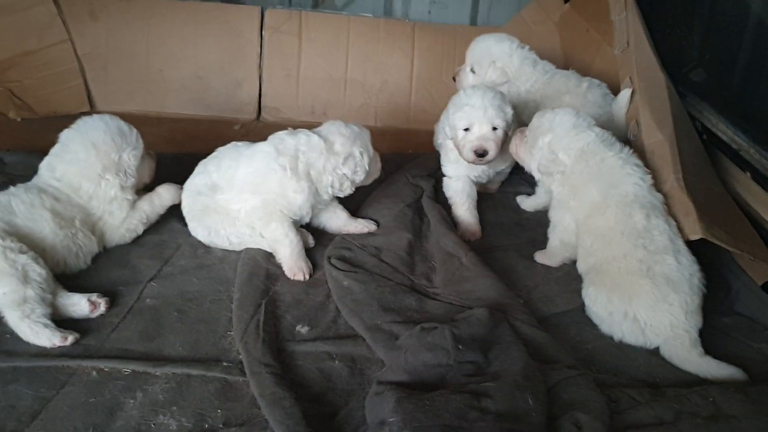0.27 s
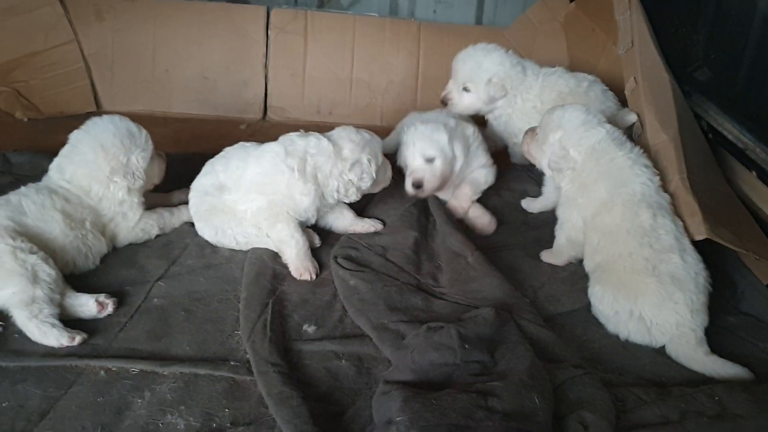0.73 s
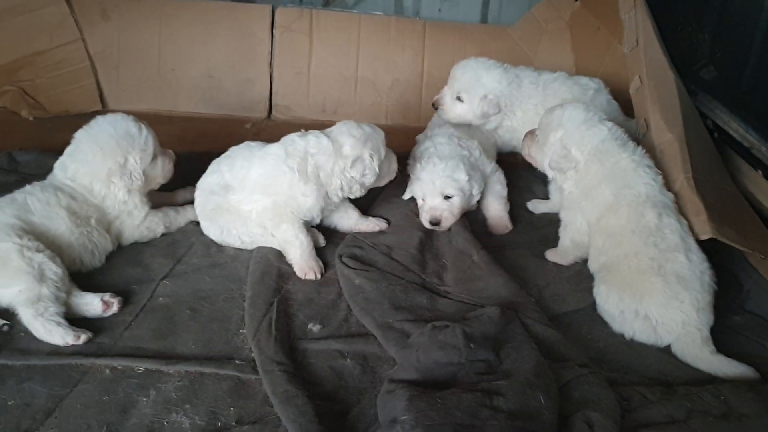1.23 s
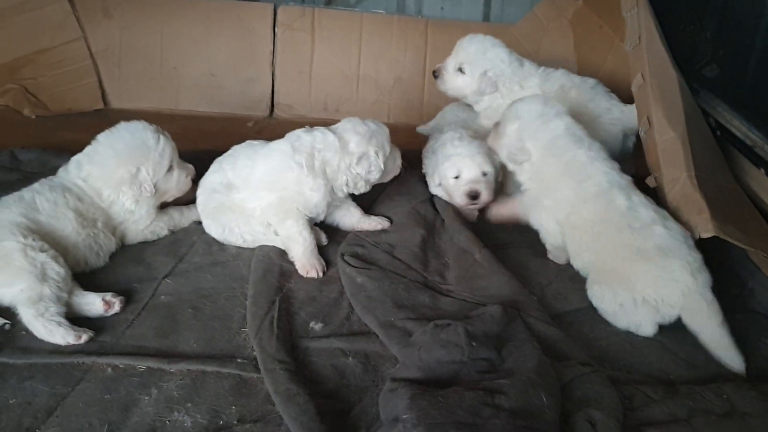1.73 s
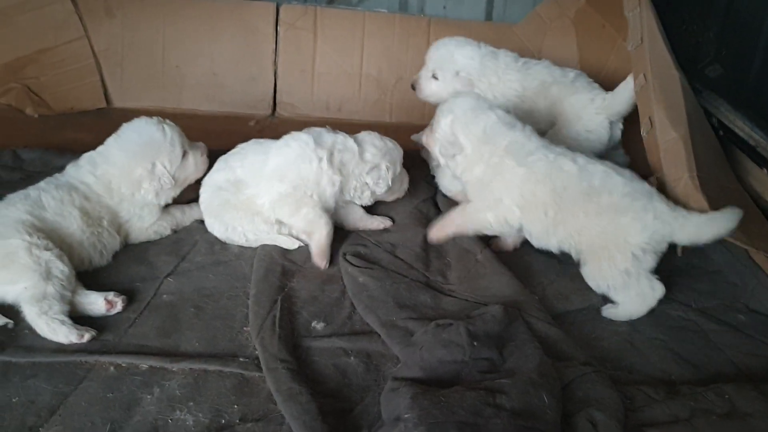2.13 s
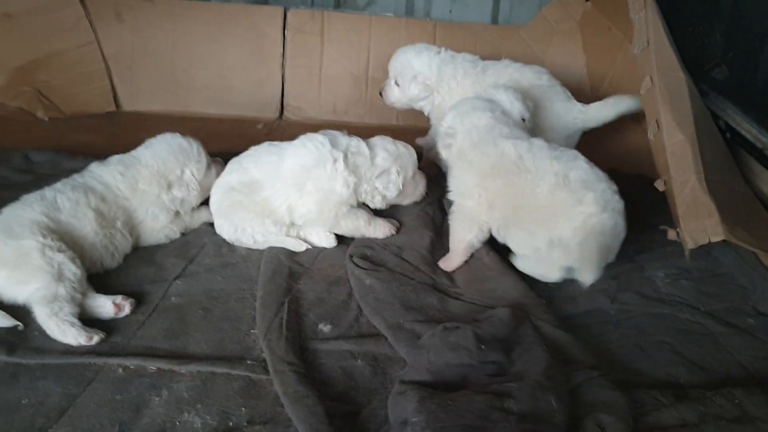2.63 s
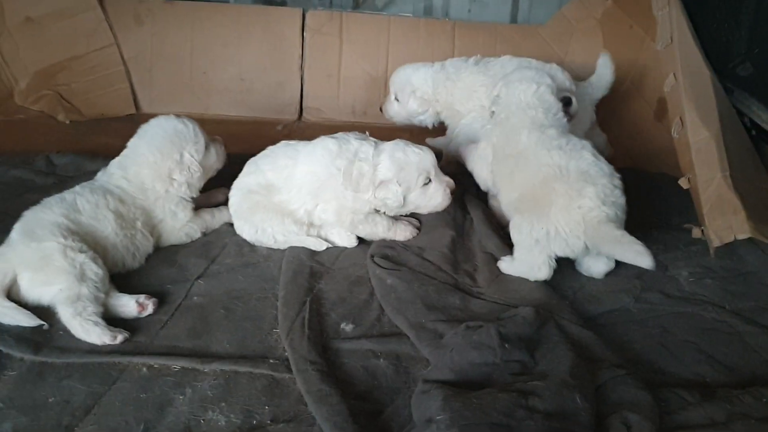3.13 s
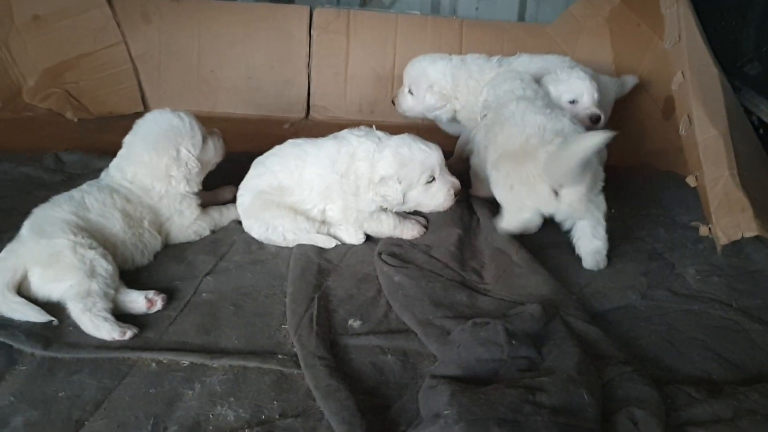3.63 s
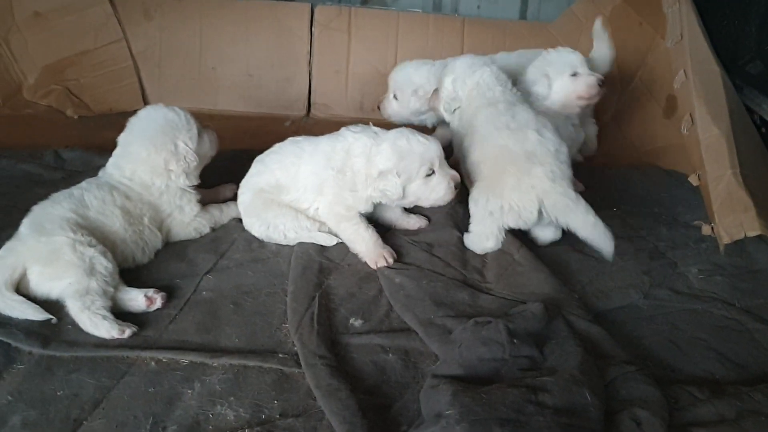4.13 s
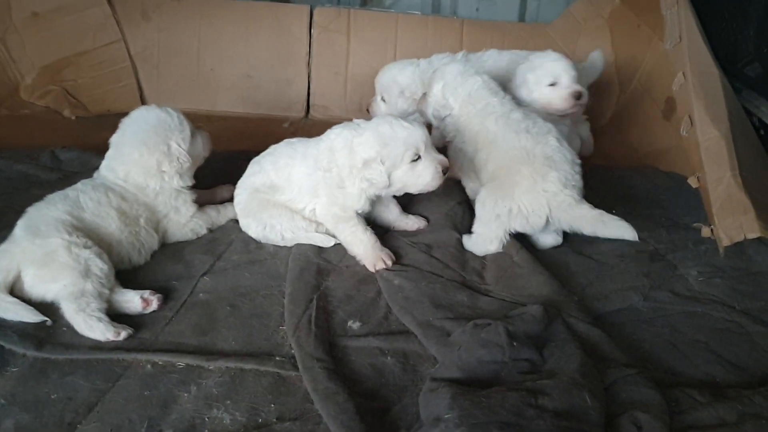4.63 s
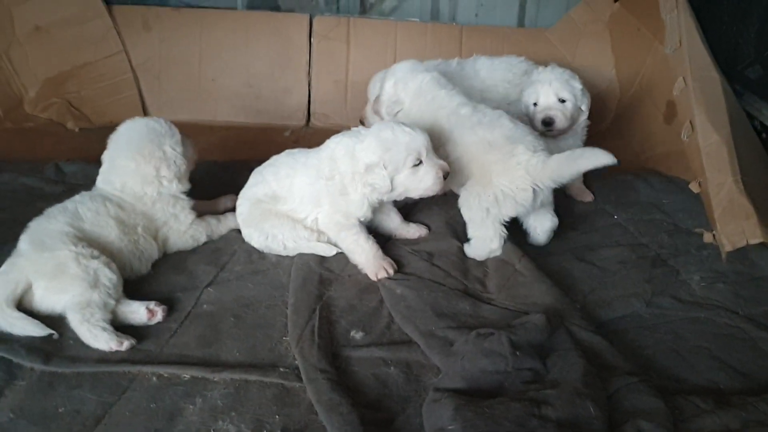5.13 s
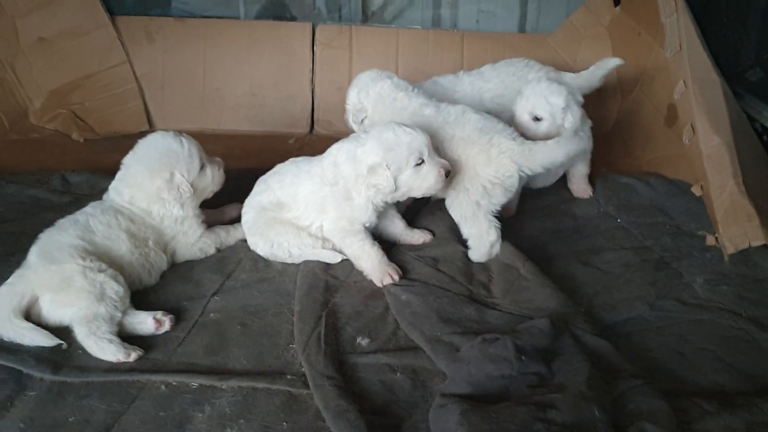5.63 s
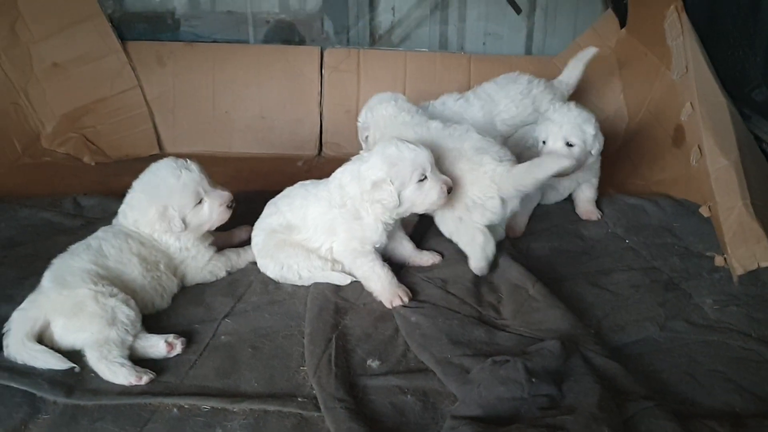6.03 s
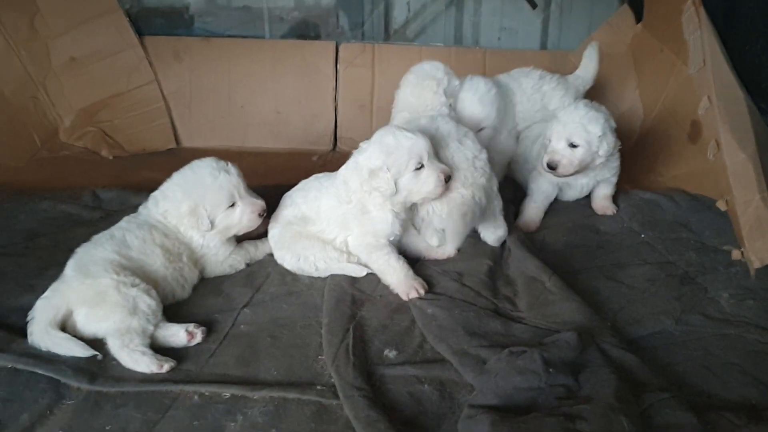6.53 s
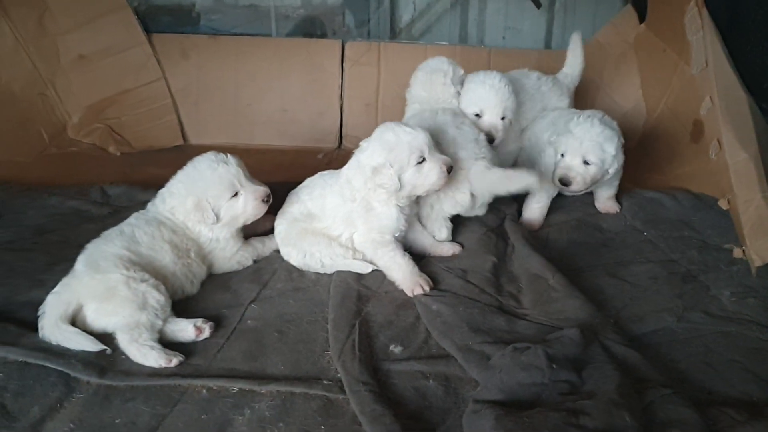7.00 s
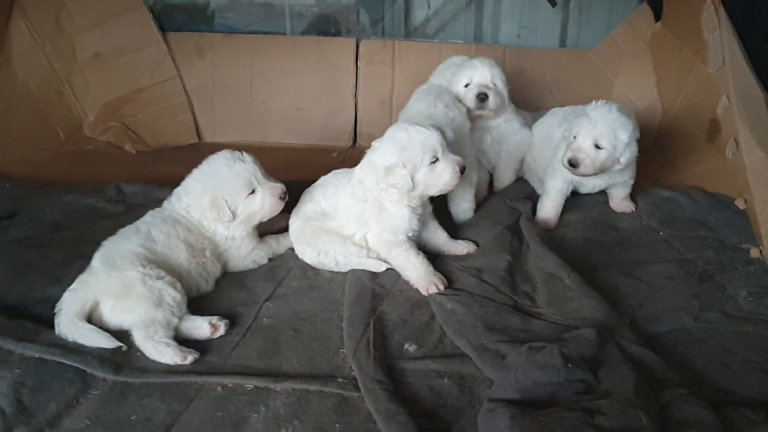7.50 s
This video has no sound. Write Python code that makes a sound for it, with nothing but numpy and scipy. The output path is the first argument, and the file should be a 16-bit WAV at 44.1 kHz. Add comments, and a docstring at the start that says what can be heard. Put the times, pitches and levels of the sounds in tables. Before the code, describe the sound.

A close, dry stereo scene of puppies tussling on a blanket in a cardboard box, over faint hiss and very low rumble. From 0 to 0.7 s, quick bright paw scrapes and cloth rustle with soft low bumps. Around 1.1 s, small card crackles; then quiet rubbing. At 2.0-2.6 s, a flank slides along the wall on the right with faint low creaks, ending in a sharp tick and bump. Near 3.1 s, a firm padded thud with a scratch and crack, another tick, then a tiny wet smack at 3.3 s. A swipe at 3.45 s leads to a thin, nearly pure squeak at 3.8-4.0 s, rising and faltering. A sharp knock lands at 4.14 s, a dry snap far left at 4.97 s, a bump at 5.2 s. Gentle shuffling and barely audible whimpers follow, busier after 7.3 s, with the strongest deep thump at 7.6 s and final scrapes.

```python
"""A big cardboard box with a blanket in it: young puppies clamber over each other.
Shaped noise makes fur and paws rub and swipe over the cloth and one flank slide along the wall; narrow
noise makes low creaks of the card and faint whimpers. Decaying tones, noise and filtered clicks make
bumps on the floor, ticks of claws and card, a smack and a snap. One pup gives a thin rising squeak,
a gliding sine with a little noise. A faint hiss and a low rumble, both filtered noise, lie underneath."""
import sys
import numpy as np
from scipy import signal
from scipy.fft import rfft, irfft, next_fast_len
from scipy.io import wavfile
from scipy.ndimage import uniform_filter1d

SR = 44100
rng = np.random.default_rng(int(sys.argv[2]) if len(sys.argv) > 2 else 0)


def store_wav(level_fs):
    """Save 16-bit WAV to argv[1]."""
    pcm = np.round(np.clip(np.atleast_2d(level_fs), -1, 1) * 32767)
    wavfile.write(sys.argv[1], SR, pcm.T.astype(np.int16))


N = 342216
TIME = np.arange(N) / SR

# Spectrum of scraped cloth. Each row: frequency in Hz, density in dB per Hz.
CLOTH_SPECTRUM = [(1500, -12.5), (2050, -8.5), (2450, -2.5), (3300, 1), (4200, 0.5), (5200, 0), (6300, -3),
                  (7300, -6), (8300, -15), (10000, -53)]
# Level of the background hiss over time. Each row: time in seconds, level in dB.
HISS_LEVEL = [(0, -63.5), (1.5, -70), (2.5, -69), (3.7, -67.5), (4.4, -70), (4.65, -75.5), (5.0, -66),
              (6.3, -66.5), (7.0, -69.5), (7.76, -59.5)]


def from_db(db):
    """Decibels to gain."""
    return 10 ** (np.asarray(db) / 20)


def rms_one(x):
    """Scale to unit rms."""
    return x / np.sqrt(np.mean(x ** 2) + 1e-20)


def in_time(rows):
    """Each column of a curve at every sample."""
    s, *columns = np.transpose(rows)
    return [np.interp(TIME, s, c) for c in columns]


def panned(pan_db):
    """Left and right gains whose mean is one; positive is louder on the left."""
    gains = from_db([[pan_db / 2], [-pan_db / 2]])
    return gains / gains.mean()


def drift(per_s):
    """Random wander of unit rms, with this many knots per second."""
    knots = rng.standard_normal(N // 4)
    return rms_one(np.interp(TIME * per_s, np.arange(len(knots)), knots))


def coloured(x, spectrum):
    """Give a sound a smooth spectrum that falls 30 dB per octave beyond its ends."""
    size = next_fast_len(N)
    hz, db = np.transpose(spectrum)
    octave = np.log2(np.maximum(np.arange(size // 2 + 1) * SR / size, 1))
    beyond = np.abs(octave - np.clip(octave, np.log2(hz[0]), np.log2(hz[-1])))
    gain = from_db(np.interp(octave, np.log2(hz), db) - 30 * beyond)
    return irfft(rfft(x, size) * gain, size)[..., :N]


def stereo_noise(alike):
    """White noise whose two sides correlate by this much."""
    mid, side = rng.standard_normal((2, N))
    alike = np.clip(alike, -.9, .99)
    return np.sqrt(1 + alike) * mid + np.sqrt(1 - alike) * side * [[1], [-1]]


def patchy(x, patch_db):
    """As the contact moves, narrow bands of the sound come and go."""
    frames = signal.stft(x, nperseg=512)[2]
    patches = rng.standard_normal(frames.shape[1:])
    patches = uniform_filter1d(patches, size=4, axis=0)  # over frequency
    patches = uniform_filter1d(patches, size=5, axis=1)  # over time
    return signal.istft(frames * from_db(patch_db * rms_one(patches)))[1][:, :N]


def friction(spectrum, alike, grain_db, patch_db, pan_db):
    """Noise broken into tiny slips of uneven strength; the mean of both sides has unit rms."""
    slips = from_db(grain_db * (drift(1500) + 0.44 * drift(170)))
    grains = patchy(stereo_noise(alike) * slips, patch_db)
    sound = coloured(grains, spectrum) * panned(pan_db)
    return sound / np.std(sound.mean(0))


def resonance(x, hz, width_hz):
    """Two-pole resonance, gain about one on top."""
    r = np.exp(-np.pi * width_hz / SR)
    zeros = np.array([1, 0, -1]) * (1 - r * r) / 2
    poles = [1, -2 * r * np.cos(2 * np.pi * hz / SR), r * r]
    return signal.lfilter(zeros, poles, x + 1e-18)


def swell(s, rise, fall):
    """The samples around a crest, and an envelope about 10 dB down at rise before and fall after it."""
    span = slice(max(0, int((s - 4 * rise) * SR)), min(N, int((s + 5 * fall) * SR)))
    t = TIME[span] - s
    return span, 1 / np.cosh(1.41 * t / np.where(t < 0, rise, fall)) ** 1.48


def impulse(s):
    """One unit click."""
    return 1.0 * (np.arange(N) == int(s * SR))


def background():
    """A faint hiss with a narrow sizzle in it, over a low rumble."""
    # Spectra. Each row: frequency in Hz, density in dB per Hz.
    hiss_spectrum = [(200, -14), (1000, -14.5), (2900, -29), (3350, -6), (3700, 1.5), (4250, -7),
                     (5100, -4), (5800, -8.5), (7200, -8.5), (8400, -26), (15000, -8)]
    rumble_spectrum = [(20, -22), (40, -6), (70, 3.5), (120, -11), (220, -14), (350, -9), (600, -21.5),
                       (1200, -42)]
    hiss = friction(hiss_spectrum, alike=0.076, grain_db=1.5, patch_db=.5, pan_db=0.5)
    sizzle = resonance(stereo_noise(alike=0.074), hz=3700, width_hz=360)
    sizzle = resonance(sizzle, hz=3700, width_hz=360)
    rumble = rms_one(coloured(stereo_noise(alike=0.83), rumble_spectrum))
    rumble = from_db(-73 + 3.25 * drift(9)) * rumble
    hiss_gain = from_db(in_time(HISS_LEVEL)[0])
    return hiss_gain * (hiss + from_db(-1.0) * rms_one(sizzle)) + rumble


def reflections(x, t60, wet_db):
    """Add weak, short reflections from the walls around the box: a decaying noise tail."""
    t = TIME[:SR // 2]
    tail = rng.standard_normal((2, len(t))) * from_db(-60 * t / t60) * (t > .003)
    tail = signal.sosfilt(signal.butter(1, 6000, fs=SR, output="sos"), tail)
    tail = tail / np.sqrt(np.sum(tail[0] ** 2))
    return x + from_db(wet_db) * signal.fftconvolve(x, tail, axes=1)[:, :N]


def creaks_and_whimpers():
    """Soft rough notes swell and fade: low creaks of the card, and faint whimpers near 6.23, 7.03, 7.33 s."""
    # Each row: crest in seconds, level in dB, pitch in Hz, half length in seconds.
    note_rows = [ (0.94, -63.5, 636, 0.1), (1.808, -65, 1390, 0.018), (1.976, -65, 750, 0.016),
                 (2.191, -58.5, 364, 0.02), (2.322, -66, 375, 0.062), (2.433, -57.5, 543, 0.024),
                 (2.587, -59, 470, .018), (4.14, -48, 660, .007), (4.183, -58, 690, .03),
                 (5.687, -68.5, 352, 0.14), (6.231, -67, 1170, .018), (7.025, -61, 685, .012),
                 (7.028, -60, 1210, .012), (7.329, -64, 1250, .013), (7.483, -57.5, 1090, 0.12),
                 (7.71, -55.5, 576, 0.027)]
    out, noise = np.zeros((2, N)), stereo_noise(alike=0.54) * panned(pan_db=-2.0)
    for s, db, hz, half in note_rows:
        span, envelope = swell(s, half, half)
        width_hz = 0.22 * hz
        note = resonance(resonance(noise[:, span], hz, 2 * width_hz), hz, width_hz)
        out[:, span] += from_db(db) * envelope * rms_one(note)
    return out


def slide():
    """A flank dragged along the cardboard wall, on the right: friction noise with a level curve."""
    # Level. Each row: time in seconds, level in dB.
    slide_level = [(2.0, -91), (2.06, -57.5), (2.13, -51.5), (2.22, -56), (2.3, -61.5), (2.43, -58.5),
                   (2.5, -66), (2.58, -83)]
    # Spectrum. Each row: frequency in Hz, density in dB per Hz.
    wall_spectrum = [(100, -9), (250, -4.5), (500, -6.5), (800, -5), (1500, -5), (2300, -3.5), (3300, -10),
                     (4800, -3), (5700, -20), (8500, -24.5), (14000, -15.5)]
    drag = friction(wall_spectrum, alike=0.22, grain_db=1.4, patch_db=1.5, pan_db=-3.5)
    return from_db(in_time(slide_level)[0]) * drag


def smack(s):
    """A wet mouth opens and its cavity rings for a moment."""
    # Cavity modes. Each row: frequency in Hz, t60 in seconds, level before the last filter in dB.
    mouth_modes = [(1250, 0.0083, -32), (1790, 0.025, -36)]
    t = np.clip(TIME - s, 0, .1)
    rings = np.zeros(N)
    for k, (hz, t60, db) in enumerate(mouth_modes):
        rings += (-1) ** k * from_db(db - 60 * t / t60) * np.sin(2 * np.pi * hz * t)
    return resonance(rings, hz=1550, width_hz=820)


def snap(s, peak_db):
    """One dry, dead snap with a little low body, far left: filtered clicks."""
    crack = resonance(impulse(s), hz=1540, width_hz=5300)
    body = resonance(resonance(impulse(s), hz=450, width_hz=660), hz=450, width_hz=660)
    pulse = resonance(crack, hz=700, width_hz=980) + .5 * body
    return from_db(peak_db) * panned(pan_db=27) * pulse / np.abs(pulse).max()


def ticks():
    """Claws tick and creasing card cracks: a sharp crack with a short, rough ring."""
    # Each row: start in seconds, level in dB, ring in Hz, crack in dB re ring, left over right in dB.
    tick_rows = [ (0.403, -36.5, 1720, -2, -14), (0.956, -44.5, 1000, 8, -7), (0.969, -44.5, 875, 10.5, -4),
                 (1.0816, -43.5, 700, 6.5, -6), (1.088, -42.5, 756, 6, -3), (1.1002, -38, 700, 8, -3),
                 (1.848, -43, 3500, -1, -6), (2.012, -47, 584, -13, -14), (2.042, -42, 490, -16, -24),
                 (2.631, -28, 4200, -1, -13), (3.064, -25, 2620, 1.5, 5), (3.2392, -29, 7270, -18, 10),
                 (3.975, -38, 1100, -2, 8), (4.1385, -21, 2550, -13, 0), (4.2541, -40, 1500, 7.5, 17),
                 (6.547, -43, 4000, 0, 0)]
    # Colour of a crack. Each row: frequency in Hz, level in dB.
    crack_spectrum = [(280, -18), (550, 1.5), (1200, 0), (2500, -0.5), (4300, 0.5), (5600, 3), (6800, -22)]
    out, t = np.zeros((2, N)), TIME[:SR // 10]
    splinters = rms_one(coloured(stereo_noise(alike=.3), crack_spectrum))
    for s, db, hz, crack_db, pan_db in tick_rows:
        t60 = 27 / hz  # rough ring: 60 dB down in 27 cycles; sine and crack die faster
        span = slice(int(s * SR), int(s * SR) + len(t))
        grit = rng.standard_normal((2, len(t)))
        rough = rms_one(resonance(grit + grit[::-1] / 2, hz, hz * 0.59))
        ring = 0.54 * np.sin(2 * np.pi * hz * t) * from_db(-90 * t / t60)
        ring = ring + 0.41 * rough * from_db(-60 * t / t60)
        crack = 0.52 * splinters[:, span] * from_db(crack_db - 130 * t / t60)
        out[:, span] += from_db(db) * panned(pan_db) * (resonance(ring, hz, hz * 2) + crack)
    return out


def bumps():
    """A padded weight swings the floor for a few cycles and shakes the modes of the box."""
    # Each row: crest in seconds, peak of the swing in dB, pitch in Hz, length in seconds.
    bump_rows = [ (0.343, -40, 82, 0.041), (0.417, -32.5, 80.4, 0.031), (0.576, -42, 67, 0.048),
                 (1.123, -53, 86.5, 0.035), (1.88, -56.5, 75, .03), (2.046, -42, 180, 0.0036),
                 (2.058, -51, 101, .04), (2.508, -54, 81, 0.058), (2.619, -36.5, 90, 0.029),
                 (2.669, -47, 85, 0.023), (2.74, -49.5, 62.6, 0.027), (2.896, -51, 89, .02),
                 (3.105, -28, 70.4, 0.046), (3.242, -55, 64.6, 0.12), (3.361, -50.5, 72.5, 0.032),
                 (3.658, -37, 80, 0.027), (3.712, -52, 71, 0.025), (4.141, -31.5, 152, 0.007),
                 (4.161, -39, 168, 0.022), (4.187, -38, 65.6, 0.04), (4.272, -46, 64, 0.021),
                 (5.215, -46.5, 167, .025), (5.233, -35.5, 85, 0.028), (5.631, -60.5, 84, .045),
                 (6.58, -41, 76.4, 0.023), (7.271, -52.5, 78.6, 0.053), (7.608, -22, 82, 0.025),
                 (7.632, -44.5, 175, 0.066), (7.649, -39.5, 90, 0.096), (7.722, -43, 76, 0.076)]
    # Modes of the box floor. Each row: frequency in Hz, t60 in seconds, level in dB.
    box_modes = [(67.4, 0.61, 2.5), (100.4, 0.6, -2), (132.8, 0.26, -5), (169.4, 0.35, -3),
                 (239, 0.12, -15), (307, 0.066, -35)]
    rise_share = .43
    # noise drive of the modes: its level at the usual bump, and its dB per dB of bump
    usual_bump_db, drive_db, drive_slope = -37, -59.5, 0.61
    swing, shake = np.zeros(N), np.zeros(N)
    for s, db, hz, length in bump_rows:
        span, push = swell(s, rise_share * length, (1 - rise_share) * length)
        swing[span] += from_db(db) * push * np.cos(2 * np.pi * hz * (TIME[span] - s))
        shake[span] += from_db(drive_db + drive_slope * (db - usual_bump_db)) * push
    shake = shake * stereo_noise(alike=0.83)
    for hz, t60, db in box_modes:
        width_hz = np.log(1000) / (np.pi * t60)
        evened = np.sqrt(SR / (np.pi * width_hz))  # makes up for the narrow band
        swing = swing + from_db(db) * evened * resonance(shake, hz, width_hz)
    return swing


def squeak():
    """A puppy's thin, almost pure squeak: a sine that rises and falters, its phase ahead on the right."""
    # Each row: time in seconds, pitch in Hz, tone level in dB rms.
    squeak_curve = [(3.765, 1032, -77), (3.809, 1117, -49), (3.849, 1198, -36.5), (3.895, 1252, -38),
                    (3.925, 1314, -51), (3.937, 1280, -57), (3.947, 1371, -47), (3.969, 1350, -55),
                    (3.999, 1380, -47), (4.035, 1457, -66)]
    fade_db_per_s, jitter_share, shimmer_db = 600, .004, .4
    hz, db = in_time(squeak_curve)
    outside_s = np.abs(TIME - np.clip(TIME, squeak_curve[0][0], squeak_curve[-1][0]))
    effort = from_db(db - fade_db_per_s * outside_s + shimmer_db * drift(100))
    phase = 2 * np.pi * np.cumsum(hz * (1 + jitter_share * drift(200))) / SR
    phase = phase + np.array([[-.2], [.2]])
    # air re tone at the loudest point; it follows the tone at half its dB
    air = from_db(-25.5) * rms_one(resonance(stereo_noise(alike=0.6), hz=1280, width_hz=560))
    return np.sqrt(2) * effort * np.sin(phase) + np.sqrt(effort * effort.max()) * air


def snags(per_s):
    """Single threads catch and let go at random; unit rms."""
    snaps = (rng.random(N) < per_s / SR) * from_db(5 * np.minimum(rng.exponential(1, N), 3))
    return rms_one(coloured(snaps * stereo_noise(alike=0.2), CLOTH_SPECTRUM))


def rub(start, length):
    """A body starts to move, slides on evenly and comes to rest."""
    attack_s, release_db_per_s = 0.034, 187
    attack = np.clip((TIME - start) / attack_s, 0, 1)
    return attack * from_db(-release_db_per_s * np.clip(TIME - start - length, 0, 1))


def rubbed_cloth():
    """The weave scrapes, threads snag and the stiff card under it adds narrow rings."""
    # Rings of the card. Each row: frequency in Hz, width in Hz, level in dB.
    card_rings = [(2660, 59, -4.5), (2910, 130, -9), (4250, 74, -9), (4750, 110, -2.5), (5040, 37, -10),
                  (5120, 45, -9), (5820, 39, -3)]
    cloth = friction(CLOTH_SPECTRUM, alike=0.02, grain_db=1.5, patch_db=2.5, pan_db=-4.0)
    cloth = cloth + from_db(-23.5) * snags(per_s=370)
    cloth = cloth + sum(from_db(db) * resonance(cloth, hz, width) for hz, width, db in card_rings)
    return cloth / np.std(cloth.mean(0))


def rustle():
    """Rubs and paw strokes on the blanket: cloth scrapes, fibres fizz, the cardboard below sounds along."""
    # Spectra. Each row: frequency in Hz, density in dB per Hz.
    card_spectrum = [(120, 5), (200, -3), (400, -5), (650, 6.5), (900, -1), (1200, 2), (1700, 0.5),
                     (2200, 3), (3000, -25)]
    fibre_spectrum = [(6500, -1.5), (8400, -11), (10000, -5), (12500, -0.5), (15000, 0), (17000, -7)]
    # Body shifts. Each row: start and length in seconds, cloth in dB, card and fizz in dB re cloth.
    rub_rows = [ (0.0, 0.26, -61, -7.5, -4), (0.385, 0.23, -48, -11.5, -3), (0.636, 0.05, -70, -21, 12.5),
                (0.785, 0.26, -61.5, -4, 2.5), (1.043, 0.077, -62, 2, -13), (1.296, 0.38, -67, -11, -4.5),
                (1.767, 0.23, -63, -6.5, -6.5), (2.082, 0.34, -61, -20, -6), (2.395, 0.3, -63, -2.5, -3.5),
                (2.742, 0.21, -65.5, -23, 10), (2.876, 0.17, -58, -2.5, -4),
                (3.203, 0.14, -70.5, -2.5, 1.5), (3.467, .21, -71.5, -0.5, 1), (3.918, .08, -63.5, -3, 0),
                (3.998, 0.092, -53.5, -7, -6), (4.148, 0.096, -60, -6, -3), (4.25, .04, -69.5, -1, -12),
                (4.55, 0.062, -74, -8, -6), (4.882, 0.13, -70.5, -1, 0), (5.091, .15, -63, -12, 0),
                (5.261, 0.15, -57, -15, -2.5), (5.448, 0.27, -57.5, -10.5, -3), (5.74, .32, -65, -9, 3),
                (6.14, 0.093, -64, -9.5, 3.5), (6.34, 0.092, -72, 3, 6.5), (6.724, 0.2, -68.5, -8, 4),
                (6.953, 0.16, -69, -7, 4.5), (7.126, 0.36, -61.5, -17, 4.5), (7.338, 0.36, -55, -1.5, 0.5)]
    # Quick paw strokes. Each row: fastest moment in seconds, level in dB, length in seconds,
    # scrape centre in Hz, card and fizz in dB re scrape.
    swipe_rows = [ (0.014, -47.5, 0.06, 4730, -23, -7.5), (0.3, -42.5, 0.036, 5000, -8, 0.5),
                  (0.324, -32, 0.026, 4900, -25.5, -1), (0.379, -46.5, 0.034, 4050, -18, -9),
                  (0.45, -41, 0.042, 4700, -22, -2), (0.503, -41.5, 0.036, 4560, -24, -9),
                  (0.56, -50.5, 0.015, 3800, -18, 3.5), (0.61, -52, .05, 3900, -19, -7),
                  (1.104, -46.5, .011, 3170, -5, -30), (1.651, -64, 0.019, 4400, -4, -4),
                  (1.759, -55.5, 0.015, 5000, -22, -14), (1.853, -54, .008, 3600, -9, -7),
                  (2.534, -59.5, 0.023, 4000, -5, -16), (2.643, -55.5, 0.071, 5000, -25, 5.5),
                  (2.871, -50.5, 0.064, 5340, -20, -7), (2.964, -44.5, 0.053, 5170, -13, -0.5),
                  (3.07, -30, 0.0094, 4050, -17.5, -9.5), (3.114, -58, 0.083, 4200, -12, -5),
                  (3.24, -55, 0.073, 6100, -8.5, -5), (3.428, -48.5, 0.029, 4060, -33, -0.5),
                  (3.463, -38, 0.035, 5700, -20, -4), (4.055, -46, 0.062, 3300, -22, 3),
                  (4.088, -44.5, 0.018, 3250, -8.5, 1), (4.14, -33, 0.0087, 3580, -14, -0.5),
                  (4.192, -47.5, 0.05, 4000, -15, -2.5), (4.479, -63, 0.034, 4000, -6, -6),
                  (4.96, -53, 0.033, 4430, -25, -10), (5.207, -44, 0.007, 4500, -18, -2),
                  (5.63, -42, 0.037, 3400, -26, -1), (5.905, -52, 0.058, 4970, -39, -4),
                  (6.552, -54.5, 0.024, 4200, -13.5, -4), (6.579, -52.5, .036, 4250, -27, -11),
                  (6.62, -44.5, 0.039, 3700, -28, -12), (6.64, -46, 0.016, 5540, -30, -2.5),
                  (7.2, -49.5, .023, 4400, -35, -4), (7.265, -56, 0.018, 5000, -14, 2),
                  (7.373, -45, 0.012, 4100, -7, -7), (7.627, -44, 0.051, 4220, -12.5, -8),
                  (7.713, -46, 0.02, 4370, -2.5, -6), (7.755, -43.5, 0.037, 4940, -22, -6)]
    # Unceasing fidgeting: cloth, card and fizz in dB re HISS_LEVEL.
    fidget_db = (-8, -17, -5.5)
    # a long stroke spends this share speeding up; one as short as jab_s half that share
    rise_share, jab_s = 0.63, 0.0087

    cloth = rubbed_cloth()
    card = friction(card_spectrum, alike=0.48, grain_db=2.5, patch_db=2.5, pan_db=-0.5)
    fizz = friction(fibre_spectrum, alike=0.062, grain_db=1.0, patch_db=2.5, pan_db=7.0)

    power = np.outer(from_db(fidget_db), from_db(in_time(HISS_LEVEL)[0])) ** 2
    for start, length, db, card_db, fizz_db in rub_rows:
        gains = from_db([[db], [db + card_db], [db + fizz_db]])
        power = power + (gains * rub(start, length)) ** 2
    out = sum(layer * gain for layer, gain in zip((cloth, card, fizz), np.sqrt(power)))
    out = out * from_db(1.06 * drift(40))  # level wobble

    for s, db, length, hz, card_db, fizz_db in swipe_rows:
        rise = rise_share * length * length / (length + jab_s)
        span, speed = swell(s, rise, length - rise)
        # each stroke favours a band of its own
        band = resonance(resonance(cloth[:, span], hz, 3600), hz, 3600)
        stroke = 0.52 * cloth[:, span] + 0.56 * band
        stroke = stroke + from_db(card_db) * card[:, span] + from_db(fizz_db) * fizz[:, span]
        out[:, span] += from_db(db) * speed * stroke
    return out


def scene():
    """All the puppies' doings in the box, over the background."""
    paws = rustle() + slide() + creaks_and_whimpers() + ticks()
    reflected = reflections(paws, t60=0.12, wet_db=-13.0)
    close = smack(s=3.326) + snap(s=4.972, peak_db=-22.5)
    return reflected + close + bumps() + squeak() + background()


def record(dry):
    """The top is cut steeply by an elliptic low-pass."""
    cutoff_hz = 15950
    return signal.sosfilt(signal.ellip(12, .1, 70, cutoff_hz, fs=SR, output="sos"), dry)


dry = scene()
out = record(dry)
store_wav(out)
```